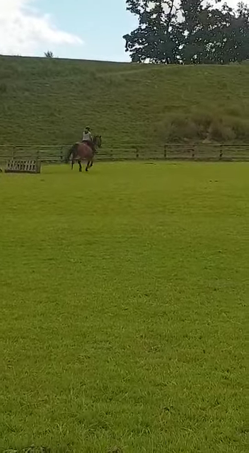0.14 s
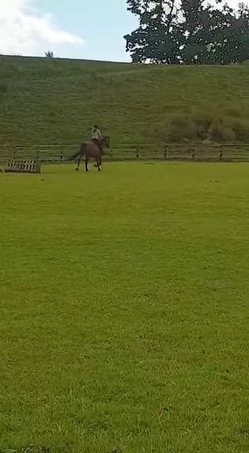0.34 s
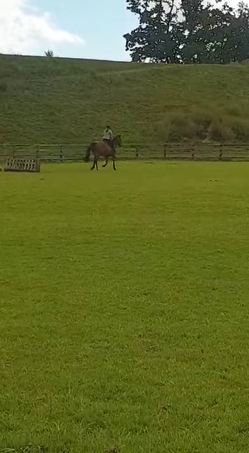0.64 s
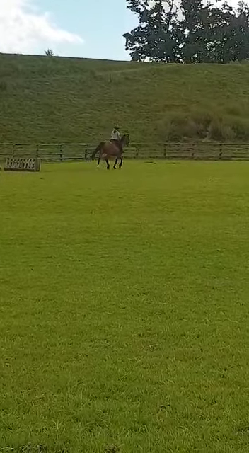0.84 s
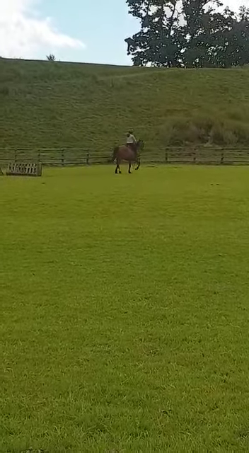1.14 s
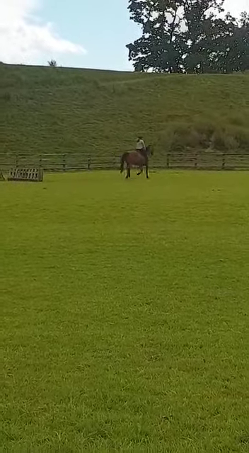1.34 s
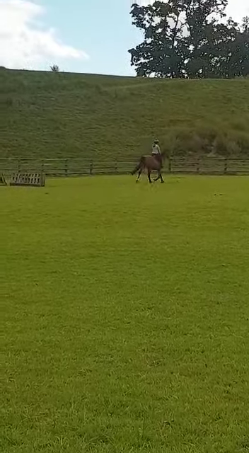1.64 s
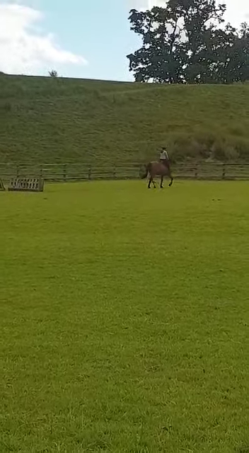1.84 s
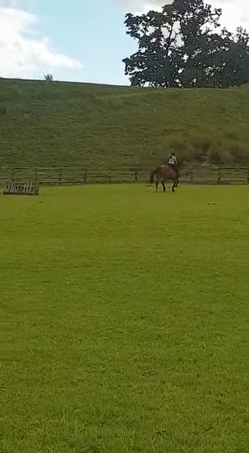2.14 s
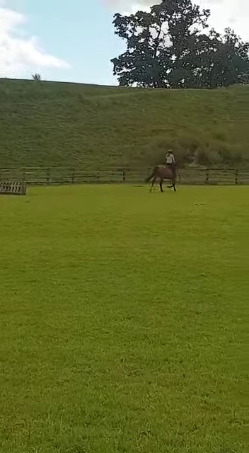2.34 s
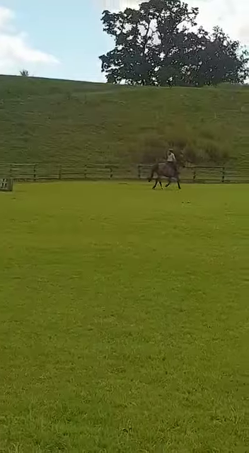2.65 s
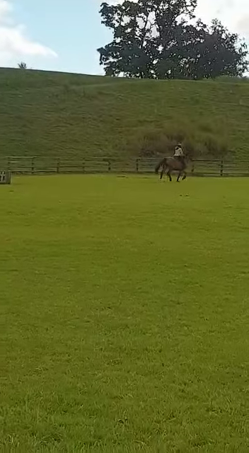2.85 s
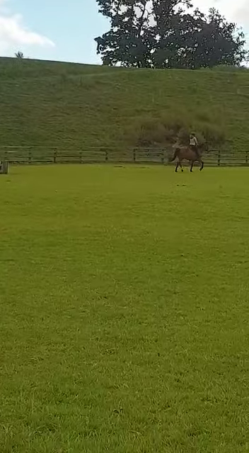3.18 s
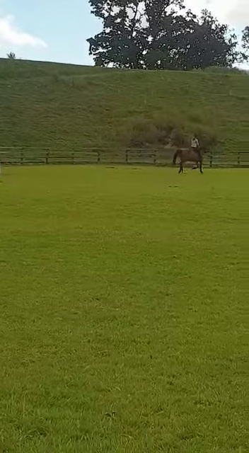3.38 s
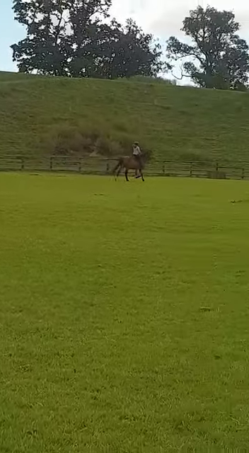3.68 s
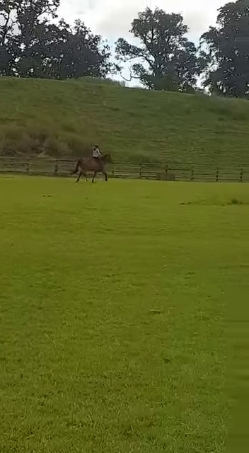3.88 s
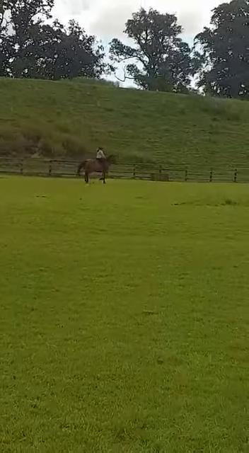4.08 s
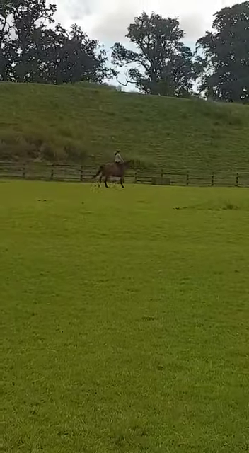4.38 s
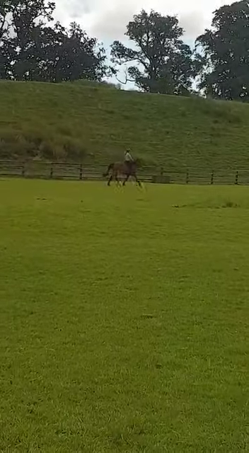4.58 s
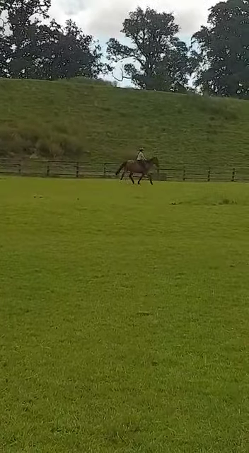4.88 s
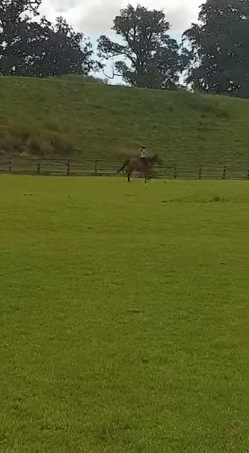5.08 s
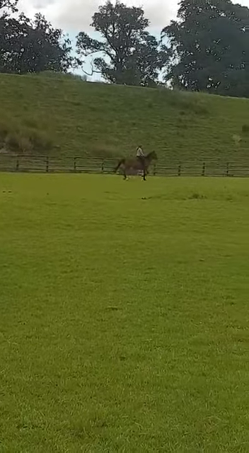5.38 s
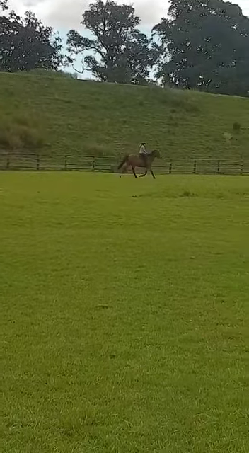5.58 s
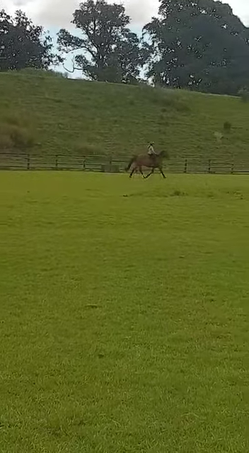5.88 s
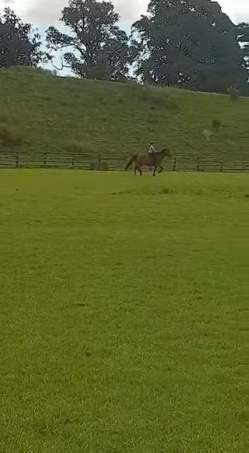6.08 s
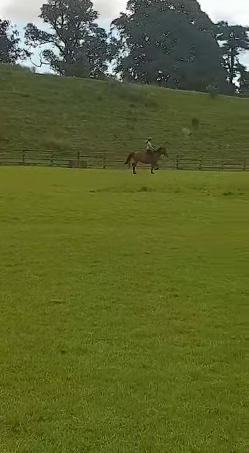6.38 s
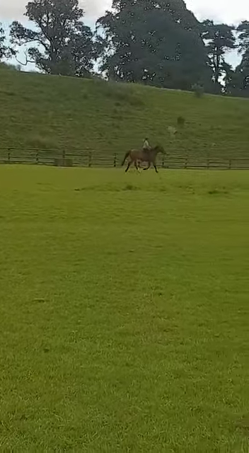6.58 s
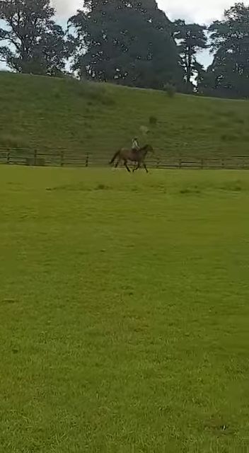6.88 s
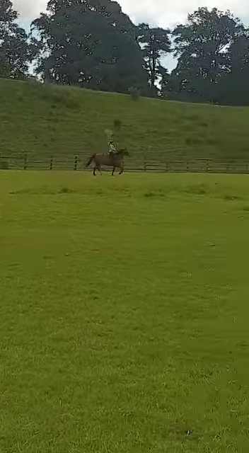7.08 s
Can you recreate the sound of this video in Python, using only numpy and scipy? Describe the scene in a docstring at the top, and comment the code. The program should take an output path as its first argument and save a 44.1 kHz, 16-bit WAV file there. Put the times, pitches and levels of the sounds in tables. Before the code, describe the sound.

Wind blows across an open field for about seven seconds, heard through a phone microphone as a constant low rumble beneath a steady, distant rush. A faraway engine adds a deep, wavering drone that fades in and out; its pitch sags around 4.5 to 5 seconds, then climbs until nearly 7 seconds. Small birds repeat faint, high, rising chirps, busiest in the first 3.5 seconds, with a few thin whistles later. Faint hoarse bird calls come from far off at about 0.4, 3.2, 5.3 and 5.9 seconds. Something brushes lightly against the phone from about 3 seconds, with a brief, crisper scuff at 4 seconds. One hollow gust swells between 5 and 6 seconds and eases away. A small dry tick follows just after 6 seconds, and another soft brush comes around 7 seconds as the wind continues.

```python
"""Breezy open field

Wind eddies rumble at a phone's microphone under a steady, distant rush that swells once.
A far engine's firing tone drones, sags and picks up speed. Small birds repeat a few gliding calls
among thin whistles and hoarse rasps. Something brushes and ticks against the phone's case."""
import sys
import numpy as np
from scipy import signal
from scipy.fft import rfft, irfft, next_fast_len
from scipy.io import wavfile
from scipy.ndimage import uniform_filter1d, map_coordinates

SR = 44100
rng = np.random.default_rng(int(sys.argv[2]) if len(sys.argv) > 2 else 0)


def generate_wav(sig):
    """Save sig (samples, or channels by samples) to the path in sys.argv[1] as 16-bit PCM at SR."""
    pcm = np.round(np.clip(np.atleast_2d(sig).T, -1, 1) * 32767).astype(np.int16)
    wavfile.write(sys.argv[1], SR, pcm)


N = 318843
TIME_S = np.arange(N) / SR
BAND_LIMIT_HZ = 15800

# far rush strength: time_s, level_db
RUSH_LEVELS = [(0, -42.5), (1, -43.5), (1.6, -45.5), (2.1, -45), (2.45, -43), (3.05, -44), (3.75, -42),
               (4.2, -44), (4.8, -42.5), (5.7, -40.5), (6.2, -43), (6.9, -45.7), (7.23, -44.5)]
# wind layer spectra: freq_hz, gain_db
RUMBLE_SPECTRUM = [(14, -45.5), (22, -23), (31, -17), (41, -9.5), (52, -2.5), (64, -1.5), (76, 0), (97, -6),
                   (138, -11.5), (210, -13), (250, -21), (420, -24), (550, -47.5), (920, -100)]
RUSH_SPECTRUM = [(200, -29), (300, -20.5), (420, -16), (500, -7.5), (600, -1.5), (740, 2.5), (900, -2.5),
                 (1100, -6), (1400, -23.5), (2000, -32.5), (3000, -74.5)]
GUST_SPECTRUM = [(300, -40), (440, -19), (550, -3), (690, 3.5), (800, -0.5), (950, -17), (1400, -23.5),
                 (2500, -68)]
UPPER_RUSH_SPECTRUM = [(500, -40), (900, -2), (1200, 3.5), (1500, -0.5), (2000, -8.5), (2400, -22),
                       (2750, -22.5), (3200, -30), (4500, -40.5), (8000, -67.5)]
HISS_SPECTRUM = [(1500, -22), (3000, -10), (4000, -7.5), (5600, -4.5), (7000, -11.5), (8600, -17),
                 (10000, -12), (12500, -4), (15500, -5)]
# microphone port imbalance: freq_hz, left_minus_right_db
PORT_BALANCE = [(60, .5), (200, .5), (380, 5), (550, 6), (750, -1), (1020, 4.5), (1500, 0), (2200, 7),
                (4400, 5), (8000, 2.5), (15000, 0)]

# far engine: time_s, firing_hz, level_db
ENGINE_TRACK = [(0, 57.5, -57), (.5, 56.3, -52), (.75, 58.7, -55), (.95, 61.07, -45), (1.5, 61.1, -46.5),
                (1.9, 59.47, -59), (2.6, 59.9, -45.5), (3.55, 61.04, -49.5), (4, 60.1, -55),
                (4.68, 52.8, -56), (4.85, 51.1, -47), (5.1, 51.6, -39), (5.35, 57.26, -44.5),
                (5.58, 63.17, -43), (5.97, 68.64, -56), (6.2, 69.7, -42.5), (6.8, 72.9, -53.5),
                (7.1, 66, -46)]

# strokes on the case: peak_s, rise_20db_s, fall_20db_s, level_db
BRUSH_STROKES = [(1.23, .2, .12, -76.5), (2.96, .12, .16, -67.5), (3.63, 0.22, 0.24, -58.5),
                 (4.0, .55, 0.36, -65.5), (4.042, 0.06, 0.05, -46.5), (4.068, 0.05, 0.04, -45),
                 (6.73, 0.17, 0.7, -71), (6.972, 0.06, 0.2, -57), (7.046, 0.06, 0.03, -53.5),
                 (7.1, 0.33, 0.2, -69.5)]
# firmer, duller rubs: centre_s, length_s, level_db
RUBS = [(1.195, .08, -74), (3.6, 0.23, -67), (4.073, 0.044, -58), (6.74, 0.18, -74), (7.005, 0.17, -63.5)]
# snaps: start_s, relative_db
TICK_EVENTS = [(0.132, -59.5), (1.196, -58), (6.126, -44), (6.170, -60), (6.2058, -56.5)]
# contact spectra: freq_hz, gain_db
BRUSH_LEFT_SPECTRUM = [(1000, -26), (2500, -12.5), (4500, -14), (6500, -6), (8400, -34), (10500, -14.5),
                       (13000, -15.5), (15500, -11)]
BRUSH_RIGHT_SPECTRUM = [(1000, -17.5), (2500, -19.5), (4500, -10.5), (7000, -7), (8600, -12.5), (10500, -6),
                        (13000, 2.5), (15500, 1)]
RUB_SPECTRUM = [(800, -18), (2000, 9.5), (3000, -5.5), (4200, 2), (5400, -6), (6700, -4), (9000, -16),
                (15000, -29.5)]
TICK_SPECTRUM = [(1500, -10), (3000, -3), (4000, 7), (5000, 2), (6900, -2.5), (8200, -21), (15000, -24)]

# notes of each bird call: delay_s, length_s, start_hz, end_hz, gain_db
PIP_NOTES = [(0, .02, 5420, 5900, 0)]
SWEEP_NOTES = [(0, 0.033, 3750, 5540, 1), (.09, .03, 3710, 4420, -4.5)]
SLUR_NOTES = [(0, 0.033, 6000, 6900, 0), (.117, .03, 4800, 5600, 2)]
# repeats of each call: time_s, relative_db
PIP_EVENTS = [(.118, -66), (.318, -71), (.592, -68.5), (.708, -71), (2.147, -66.5), (2.27, -68),
              (2.362, -69.5), (2.461, -71), (2.687, -67.5), (2.946, -68), (3.086, -67), (3.21, -70),
              (3.41, -67), (5.547, -73), (6.112, -74)]
SWEEP_EVENTS = [(.56, -75), (1.155, -68), (1.551, -74), (2.507, -71), (3.223, -72), (3.447, -72),
                (4.398, -70.5), (4.684, -71), (5.89, -76)]
SLUR_EVENTS = [(.11, -69.5), (1.979, -70), (2.736, -74), (5.134, -73)]
# thin held whistles: centre_s, length_s, pitch_hz, relative_db
HELD_WHISTLES = [(2.298, .14, 6500, -82), (4.886, .09, 7570, -85), (4.679, .17, 5120, -80.5),
                 (5.325, .19, 7110, -75), (5.698, .14, 4570, -76)]
# hoarse far calls: centre_s, length_s, pitch_hz, width_hz, relative_db
RASP_CALLS = [(.39, .24, 2570, 400, -69.5), (2.3, 0.19, 6930, 600, -77), (3.168, .4, 2680, 450, -66.5),
              (5.252, 0.46, 2620, 700, -65.5), (5.313, 0.18, 7170, 800, -76), (5.85, .16, 2600, 450, -70)]


def wind():
    """Eddies rumble at the phone; a far rush with one hollow gust, over faint hiss."""
    rush_db, = curves(RUSH_LEVELS)
    rumble = amp(-44.5 + 0.6 * wobble(rate_hz=12)) * noise(RUMBLE_SPECTRUM, side_db=-20, patch_db=0.1)
    rush = amp(rush_db + 0.22 * wobble(rate_hz=7.6)) * noise(RUSH_SPECTRUM, side_db=-15.5, patch_db=0.32)
    surge = amp(-41) * arch(centre_s=5.43, length_s=1.14)
    gust = surge * noise(GUST_SPECTRUM, side_db=-18, patch_db=-0.2)
    upper_db = -52 + 0.35 * (rush_db - rush_db.mean()) + 0.42 * wobble(rate_hz=6)
    upper_rush = amp(upper_db) * noise(UPPER_RUSH_SPECTRUM, side_db=-6, patch_db=1)
    hiss = amp(-76.5) * noise(HISS_SPECTRUM, side_db=1.5, patch_db=0)
    return rumble + rush + gust + upper_rush + hiss


def engine():
    """Only the firing tone carries this far; moving air makes it waver."""
    firing_hz, level_db = curves(ENGINE_TRACK)
    pitch_hz = firing_hz * (1 + 0.023 * wobble(rate_hz=14))
    return amp(level_db + 1.1 * wobble(rate_hz=8.2)) * unit(sine(pitch_hz))


def brushing():
    """Friction grains swell and fade per stroke, brightest at the right port; rubs add body."""
    strokes = [amp(level_db - 20 * np.maximum((peak_s - TIME_S) / rise_s, (TIME_S - peak_s) / fall_s))
               for peak_s, rise_s, fall_s, level_db in BRUSH_STROKES]
    pressure = np.linalg.norm(strokes, axis=0)  # power sum
    grains = rng.standard_normal((2, N)) * amp(1.3 * wobble(rate_hz=360))
    spectra = BRUSH_LEFT_SPECTRUM, BRUSH_RIGHT_SPECTRUM
    friction = filtered(grains, lambda hz: amp([db_at(s, hz) for s in spectra]) * (hz < BAND_LIMIT_HZ))
    rub_envelope = sum(amp(level_db) * arch(centre_s, length_s) for centre_s, length_s, level_db in RUBS)
    return pressure * unit(friction) + rub_envelope * noise(RUB_SPECTRUM, side_db=2.5, patch_db=7)


def ticks(t60_s=0.007):
    """Small dry snaps: noise bursts with a faint tail."""
    envelope = sum(amp(relative_db - 60 * np.abs(TIME_S - start_s) / t60_s) * (TIME_S >= start_s)
                   for start_s, relative_db in TICK_EVENTS)
    bursts = envelope * rng.standard_normal((2, N))
    snaps = bursts + amp(-7.5) * scatter(bursts[0], t60_s=0.28)
    return amp(3.5) * filtered(snaps, lambda hz: amp(db_at(TICK_SPECTRUM, hz)))


def birds():
    """Fluttering sine glides, scattered by the field's edge."""
    song = np.zeros(N + SR)
    for centre_s, length_s, start_hz, end_hz, relative_db in bird_notes():
        progress = np.linspace(0, 1, max(int(length_s * SR), 2))
        flutter = unit(uniform_filter1d(rng.standard_normal(SR // 4), size=40))[:len(progress)]
        glide = (progress + np.sin(np.pi / 2 * progress)) / 2  # steep, then easing
        pitch_hz = (start_hz + (end_hz - start_hz) * glide) * (1 + 0.025 * flutter)
        note = np.sin(np.pi * progress) * sine(pitch_hz)
        onset = max(round((centre_s - length_s / 2) * SR), 0)
        song[onset:onset + len(note)] += amp(relative_db) * note
    song = song[:N] * amp(1.4 * wobble(rate_hz=120))
    return amp(-4.5) * (song + scatter(song, t60_s=0.46))


def bird_notes():
    """All notes: centre_s, length_s, start_hz, end_hz, relative_db."""
    species = [(PIP_NOTES, PIP_EVENTS), (SWEEP_NOTES, SWEEP_EVENTS), (SLUR_NOTES, SLUR_EVENTS)]
    calls = [(time_s + delay_s, length_s, start_hz, end_hz, relative_db + gain_db)
             for notes, events in species
             for time_s, relative_db in events
             for delay_s, length_s, start_hz, end_hz, gain_db in notes]
    whistles = [(centre_s, length_s, hz, hz, db) for centre_s, length_s, hz, db in HELD_WHISTLES]
    far_pips = twitter(pitch_hz=5600, relative_db=-78, until_s=6.9, count=36)
    squeaks = twitter(pitch_hz=8350, relative_db=-84, until_s=1.9, count=10)
    return calls + whistles + far_pips + squeaks


def twitter(pitch_hz, relative_db, until_s, count, length_s=0.024, detune=0.022, spread_db=2.5):
    """Short rising notes, random in time, pitch and level."""
    centres_s = rng.uniform(0, until_s, count)
    offsets = rng.standard_normal((count, 2)) * [detune, spread_db]
    return [(centre_s, length_s, pitch_hz * (0.96 + shift), pitch_hz * (1.04 + shift), relative_db + db)
            for centre_s, (shift, db) in zip(centres_s, offsets)]


def rasps():
    """Hoarse bird calls, blurred by distance into narrow, throbbing noise bands."""
    calls = np.zeros(N)
    for centre_s, length_s, pitch_hz, width_hz, relative_db in RASP_CALLS:
        band = filtered(rng.standard_normal(N), lambda hz: 1 / (1 + (2 * (hz - pitch_hz) / width_hz) ** 4))
        calls += amp(relative_db) * arch(centre_s, length_s) * unit(band)
    calls *= amp(2.1 * wobble(rate_hz=70))
    return amp(-7) * calls + amp(-5.5) * scatter(calls, t60_s=0.28)


def scatter(x, t60_s):
    """Diffuse tail from bank and trees, uncorrelated left and right."""
    time_s = np.arange(SR // 2) / SR
    tail = rng.standard_normal((2, len(time_s))) * amp(-60 * time_s / t60_s)
    return signal.fftconvolve(x[None], tail / np.linalg.norm(tail[0]), axes=1)[:, :N]


def noise(spectrum, side_db, patch_db):
    """Stereo noise, rms 1, with drifting gain patches; side_db sets width."""
    bins = signal.stft(rng.standard_normal((2, N)), nperseg=512)[2]
    patches = uniform_filter1d(rng.standard_normal(bins.shape[1:]), size=5, axis=0)
    patches = unit(uniform_filter1d(patches, size=20, axis=1))
    pair = signal.istft(bins * amp(patch_db * patches), nperseg=512)[1][:, :N]
    mid, side = filtered(pair, lambda hz: amp(db_at(spectrum, hz)))
    return unit(np.array([mid + amp(side_db) * side, mid - amp(side_db) * side]))


def amp(db):
    """Decibels to gain."""
    return 10 ** (np.asarray(db) / 20)


def unit(x):
    """Scale to rms 1."""
    return x / np.sqrt(np.mean(x ** 2) + 1e-20)


def sine(pitch_hz):
    """Sine following a per-sample pitch."""
    return np.sin(2 * np.pi * np.cumsum(pitch_hz) / SR)


def db_at(spectrum, hz):
    """Interpolate on a log-frequency axis."""
    freq_hz, gain_db = np.transpose(spectrum)
    return np.interp(np.log(hz + 1), np.log(freq_hz + 1), gain_db)


def curves(rows):
    """Per-sample curve for each column after time_s."""
    time_s, *columns = np.transpose(rows)
    return [np.interp(TIME_S, time_s, column) for column in columns]


def arch(centre_s, length_s):
    """Half-cosine rise and fall."""
    return np.cos(np.pi * np.clip((TIME_S - centre_s) / length_s, -0.5, 0.5))


def wobble(rate_hz):
    """Smooth random curve, knots at rate_hz."""
    return map_coordinates(rng.standard_normal(int(N * rate_hz / SR) + 4), [TIME_S * rate_hz])


def filtered(x, response):
    """Zero-phase filter with gain response(hz)."""
    size = next_fast_len(N + SR // 2)
    return irfft(rfft(x, size) * response(np.fft.rfftfreq(size, 1 / SR)), size)[..., :N]


def scene():
    """Two ports colour the field slightly differently; brushing adds on top."""
    field = wind() + engine() + birds() + rasps() + ticks()
    ports = filtered(field, lambda hz: amp(np.outer([0.5, -0.5], db_at(PORT_BALANCE, hz))))
    return ports + brushing()


def record(dry):
    """The phone's band limit."""
    return filtered(dry, lambda hz: hz < BAND_LIMIT_HZ)


dry = scene()
out = record(dry)
generate_wav(out)
```